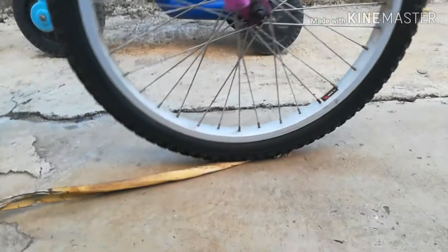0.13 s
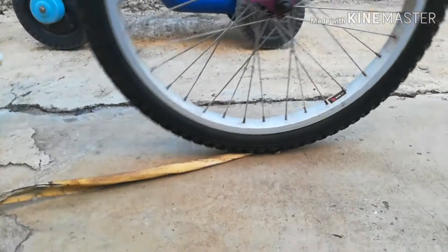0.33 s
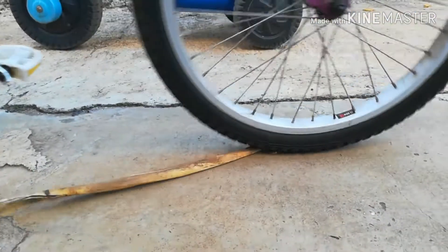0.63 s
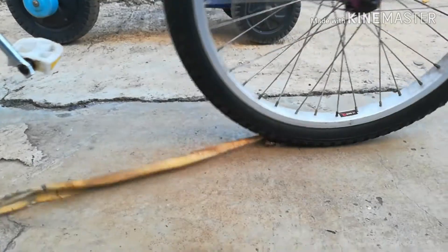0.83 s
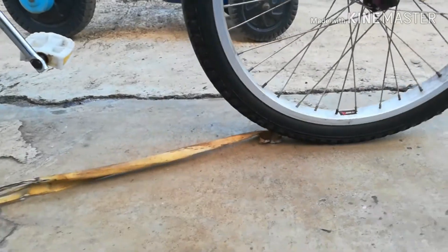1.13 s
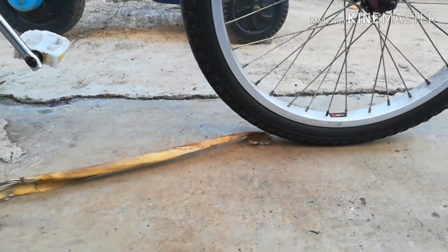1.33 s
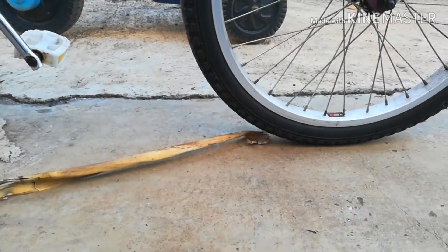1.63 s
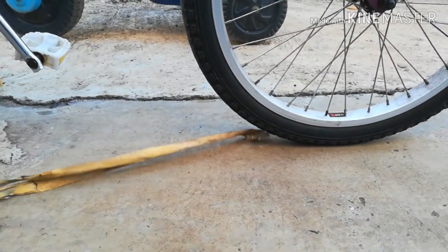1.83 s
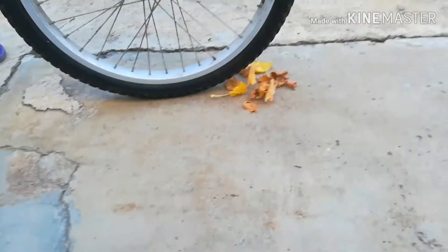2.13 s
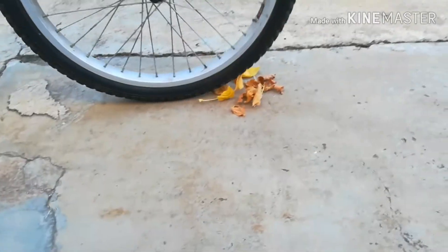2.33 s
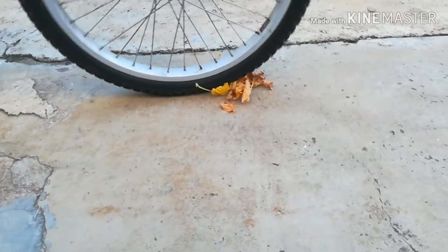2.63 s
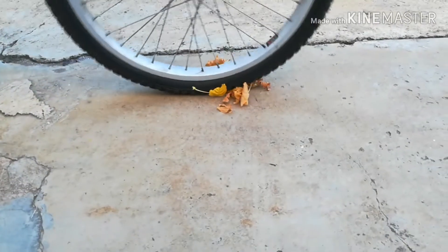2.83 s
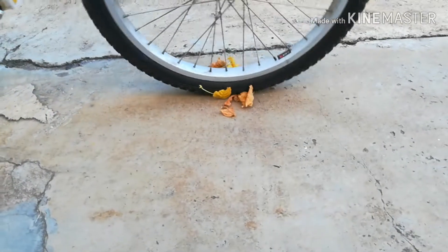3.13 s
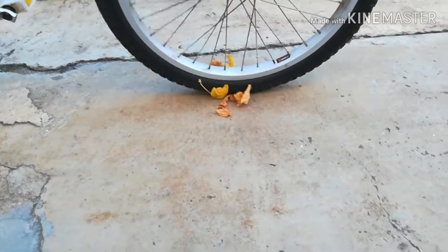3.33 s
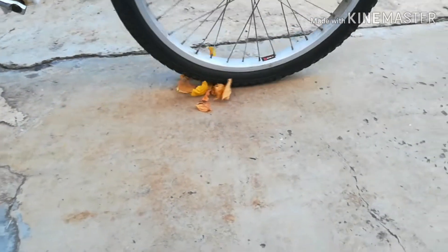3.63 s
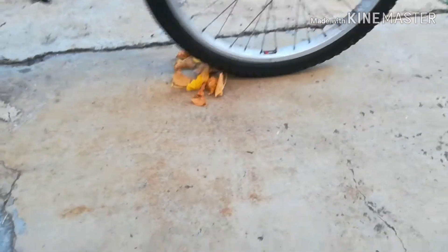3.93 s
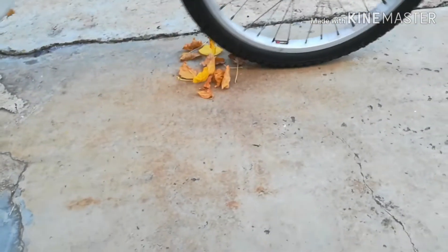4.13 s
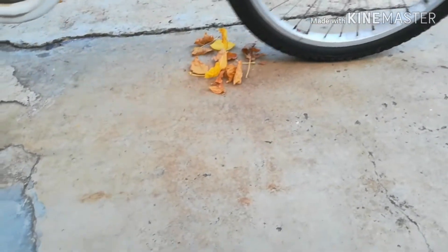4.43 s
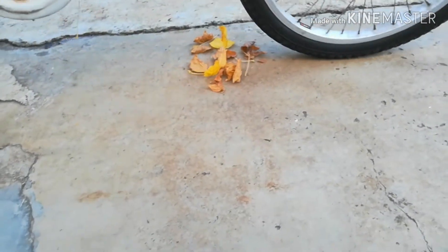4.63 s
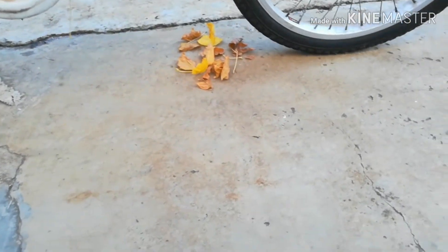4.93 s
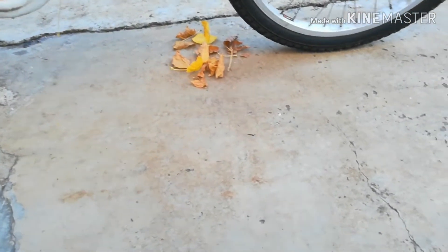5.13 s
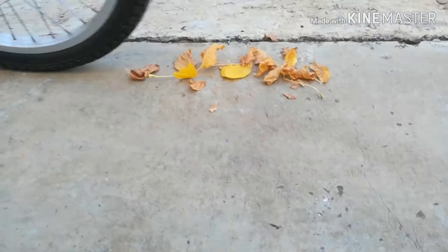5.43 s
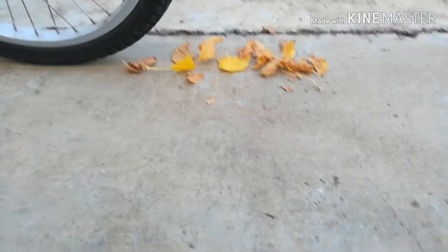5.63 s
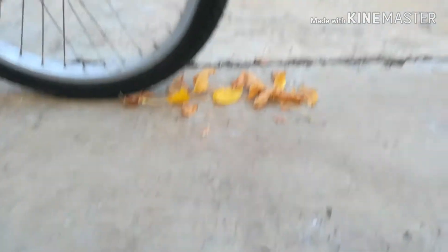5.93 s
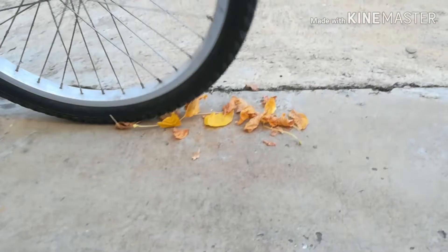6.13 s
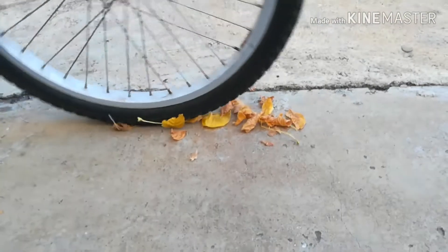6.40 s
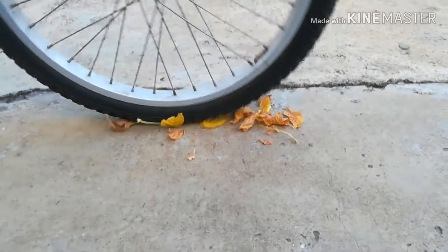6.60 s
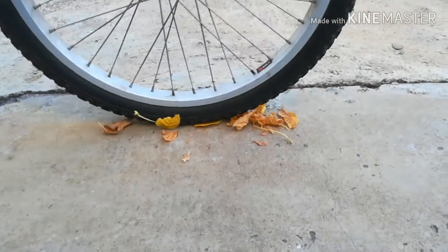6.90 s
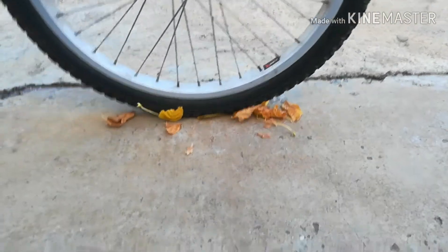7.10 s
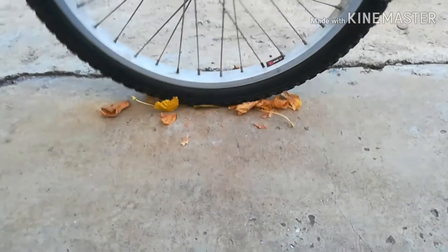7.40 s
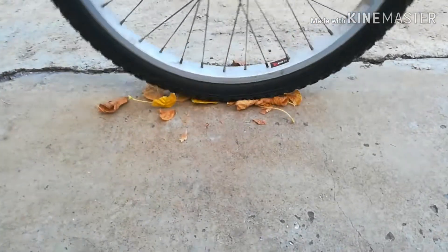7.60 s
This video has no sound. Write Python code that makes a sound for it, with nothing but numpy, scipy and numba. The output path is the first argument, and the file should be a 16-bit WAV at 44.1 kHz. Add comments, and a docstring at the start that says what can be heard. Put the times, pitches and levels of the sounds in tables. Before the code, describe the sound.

A bicycle tyre slowly squeezes a dry husk with faint rasps, then crunches twice through brittle dead leaves with sharp close cracks on concrete.

```python
"""Bicycle tyre over husk and leaves

In a concrete yard, close to a stereo microphone, a tyre rolls over a dry husk, then twice through dead leaves.
Swarms of tiny fractures, made of damped sines, crunch; husk fibres, ribs and stems snap through them as sharp
cracks. Scuffs and three faint breathy squeaks are bands of noise. The tread rumbles and grinds on grit, gusts
buffet the microphone in low noise, and steady partials give a low wavering hum in the quiet outdoor air."""
import sys
import numpy as np
from scipy import signal
from scipy.fft import rfft, irfft
from scipy.io import wavfile
from scipy.ndimage import uniform_filter1d
from numba import njit

SR = 44100
rng = np.random.default_rng(int(sys.argv[2]) if len(sys.argv) > 2 else 0)


def materialize(psi):
    """Save the field psi as 16-bit PCM at rate SR to the path in sys.argv[1].

    A 1-D psi becomes a single channel; in a 2-D psi each row is a channel.
    """
    bounded = np.clip(np.atleast_2d(psi).T, -1, 1)
    quanta = np.round(bounded * 32767).astype(np.int16)
    wavfile.write(sys.argv[1], SR, quanta)


N = 342216
TIME = np.arange(N) / SR


# the tyre's load on the pile of leaves: (time [s], crunch level [dB],
# coarse pieces [dB relative to crunch], fine splinters [dB relative to crunch])
LEAF_PILE = [(2.15, -71, -3, -5), (2.245, -64, -1, 5), (2.3, -49.5, -7.5, 4.5), (2.52, -35.5, -3.5, -5),
             (2.76, -37, -12, -9.5), (3.08, -38, -17, -4), (3.25, -51, -11.5, -3), (3.54, -57, -10.5, -13),
             (3.58, -91, 4, -12)]


def leaf_pile():
    """The first pass through leaves: brittle blades break in coarse grains under the rolling load."""
    return crunch(rolling_over(LEAF_PILE), per_s=2000, spread_db=3.0, cluster_db=4.0, cycles=2.2,
                  steady_s=0.052, hollow_db=-9)


# load on the first curled leaf of the row: columns as for the pile
FIRST_LEAF = [(5.585, -78, -4, -2), (5.605, -55, -1.5, -4), (5.66, -29, -7, -9), (5.75, -28.5, -19, -5.5),
              (5.82, -39, -16, 2.5), (5.89, -47.5, -0.5, 1), (5.98, -50.5, -1.5, -2)]


def first_leaf():
    """The second pass begins on one curled leaf, whose fractures ring a little longer."""
    return crunch(rolling_over(FIRST_LEAF), per_s=2200, spread_db=5.5, cluster_db=2.0, cycles=2.9,
                  steady_s=.019, hollow_db=-9.5)


# load on the rest of the row: columns as for the pile
LEAF_ROW = [(5.98, -51.5, -2, -3.5), (6.25, -50, -0.5, -1), (6.44, -54, 1.5, 1), (6.73, -46.5, -0.5, -3),
            (6.9, -43, -4.5, 0), (7.13, -34.5, -16.5, 0), (7.22, -41, -7, -2), (7.53, -45, -14.5, -4),
            (7.76, -62, -1.5, 2)]


def leaf_row():
    """The rest of the second pass: the pitch of the pieces wanders more widely from leaf to leaf."""
    return crunch(rolling_over(LEAF_ROW), per_s=1800, spread_db=4.0, cluster_db=3.0, cycles=2.2,
                  steady_s=0.07, hollow_db=-6.5, coarse_hz=2430, drift=.24)


# leaves stirred lightly by the passing wheel: (start [s], hold [s], crunch level [dB],
# coarse pieces [dB relative], fine splinters [dB relative], left minus right [dB])
RUSTLES = [(3.6, .22, -70.5, -1, -0.5, 3), (5.15, .005, -71, 6, -7.5, 5), (5.2, 0.0083, -61, 11, -10, 6),
           (5.243, 0.0057, -63, 2, -1, 5), (5.433, 0.006, -59, 8.5, -1, 7), (5.48, 0.0076, -57.5, 5, 0, 5),
           (5.52, 0.0097, -59.5, 7, -13, 1)]


def stirred_leaves():
    """Light touches break only small parts of the leaves."""
    return crunch(touches(RUSTLES), per_s=2000, spread_db=5.5, cluster_db=3.5, cycles=2.3,
                  steady_s=0.011, hollow_db=-7.5)


# ribs and stems that snap, and cracks of the husk while the tyre squeezes it (0.149 to 1.773 s): # (time [s],
# level [dB], middle pitch [Hz], left minus right [dB], splintering [dB relative to the snap])
SNAPS = [(0.149, -26, 7500, 2, -8), (0.1782, -34, 8240, 1, -4), (0.3056, -16, 8800, 1, -23),
         (0.3774, -24, 2780, -7, -7), (0.436, -18.5, 6300, -2, -9), (0.6044, -28.5, 4630, 8, 1),
         (0.9616, -52, 5800, -1, 8.5), (1.532, -49, 1240, -3.5, 5.5), (1.773, -32, 5060, 3, -11),
         (2.3, -8.5, 8050, -8, -22), (2.308, -16, 6750, 5, 1), (2.328, -18, 7900, -12, -3),
         (2.3671, -12.5, 8700, -5, -4.5), (2.386, -16, 7200, -2, 6), (2.505, -10, 5860, -6, -10),
         (2.5418, -4.5, 8900, -7, -9.5), (2.6068, -11.5, 5250, 0, -9), (2.6402, -14, 4900, -1, -3),
         (2.6656, -12.5, 6500, -4, -4), (2.6859, -8.5, 7940, -10, -4), (2.7344, -4.5, 11100, -9, -16),
         (2.7507, -18, 8750, -5, 6), (2.759, -10, 6360, -5, 1.5), (2.7955, -7.5, 8550, -2, 7),
         (2.8529, -8, 6050, -5, 0), (2.8839, -7, 9700, -6, -3), (2.9409, -12.5, 5650, -7, 1),
         (2.9885, -15, 5650, -6, 4), (3.028, -18, 9400, -4, 5.5), (3.053, -17, 6900, 1, -4),
         (3.092, -12, 6100, -3.5, -22), (3.2046, -24, 5700, -8, 5), (3.3404, -25, 5800, -3, 3),
         (3.4016, -24.5, 5300, 0, -10), (3.5288, -30.5, 5340, -7, 0), (3.8746, -37.5, 5980, -3, -13),
         (4.0164, -38.5, 4440, 2, 0), (4.41, -46, 5000, 0, -3), (4.5282, -39.5, 6500, -1, 3),
         (5.1957, -25, 6500, 4.5, 4), (5.4311, -21.5, 6160, 3, -11), (5.617, -12, 6360, 6, -5),
         (5.6592, -2.5, 7100, -10, -12), (5.665, -5.5, 5530, 15, -23), (5.6882, -0.5, 7660, -2, -18),
         (5.7067, -4, 6460, -7, 1.5), (5.7616, -7.5, 5370, -5, -5.5), (5.8289, -9, 6060, 6, -5),
         (5.848, -6.5, 7450, -2, -17), (5.8878, -15.5, 6430, 7, -22), (5.9491, -1.5, 6850, 0, -30),
         (6.123, -26.5, 5170, 11, -18), (6.17, -23.5, 5200, -7, 3.5), (6.2558, -22.5, 7200, -2, 5),
         (6.2824, -17, 6900, 2, -12), (6.3424, -19.5, 5560, 0, 1.5), (6.373, -16.5, 6350, -1, -10),
         (6.632, -23, 6450, 6, 1), (6.7495, -19.5, 6060, 5, 0), (6.8167, -14, 5200, 2, 1),
         (6.952, -12.5, 5660, -2, -2.5), (7.055, -13, 8600, -17, -18), (7.1176, -5.5, 5760, -6.5, -4),
         (7.1442, -8.5, 8500, -7, -17), (7.1971, -9.5, 8000, -5, -5), (7.2687, -7, 6340, -4, -1),
         (7.2877, -4, 9000, -5, -14), (7.3392, -9, 8360, -6, -16), (7.45, -6.5, 5400, -2, -23),
         (7.5204, -20.5, 6760, -6, 0), (7.6105, -26, 8200, -7, -1)]


def snapping():
    """The listed ribs, stems and husk fibres snap, and small veins snap at random among them."""
    return snaps(np.vstack([SNAPS, veins(LEAF_PILE), veins(LEAF_ROW)]))


# spectrum of the leaves: (frequency [Hz], level [dB])
LEAF_COLOUR = [(500, -1), (750, -5), (1050, -5), (1300, -6.5), (1700, -1.5), (2500, -2.5), (3300, -4.5),
               (5000, 0.5), (6500, 0), (9000, 3), (12000, 0.5), (15500, 2.5)]


def leaves():
    """All crunching leaves with the listed snaps, those of the husk included, in the colour of thin dry blades."""
    crunching = stirred_leaves() + leaf_pile() + first_leaf() + leaf_row()
    return colour(undb(-2.0) * crunching + undb(1.5) * snapping(), LEAF_COLOUR)


# the tyre squeezes the husk: columns as for the rustles
SQUEEZES = [(0.01, 0.1, -63.5, 2, 1.5, 0), (.11, 0.1, -67, -20, -4, -2), (.308, 0.018, -55.5, -5, -7, 0),
            (.38, 0.06, -51.5, 2.5, -8, -2), (.43, .03, -44.5, -2.5, -5.5, -1),
            (.48, 0.026, -44.5, -7, -5, 5.5), (.558, .05, -48, -6, -2.5, 3.5),
            (1.597, 0.079, -48.5, -2.5, -9, -2), (1.777, .025, -62, -16, -21, 0)]
# spectrum of the husk: (frequency [Hz], level [dB])
HUSK_COLOUR = [(600, 19), (850, -7), (1050, 3), (1400, -7.5), (1650, -3), (2400, -1.5), (3300, 0.5),
               (4500, -6), (6300, 1), (8500, -1), (15500, -2)]


def husk():
    """The fibrous husk rasps: its fractures come more densely than those of the leaves."""
    rasp = crunch(touches(SQUEEZES), per_s=3800, spread_db=4.5, cluster_db=5.0, cycles=2.7,
                  steady_s=0.02, hollow_db=-6.5)
    return colour(undb(-2.0) * rasp, HUSK_COLOUR)


def crunch(contact, per_s, spread_db, cluster_db, cycles, steady_s, hollow_db, coarse_hz=2100, drift=.18):
    """Fractures come in avalanches; each rings the hollow leaf or husk, a coarse piece, a flake and a splinter."""
    load, coarse_db, fine_db, pan_db = contact
    count = int(per_s * N / SR)
    chance = rng.random((count, 2))
    at = (chance[:, 0] * (N - 1)).astype(int)
    pressed = load[at] > 1e-5
    start = chance[pressed, 0] * (N - 1) / SR
    at = at[pressed]
    # many faint fractures and few strong ones, in clusters
    strength_db = spread_db * np.minimum(-np.log(chance[pressed, 1]), 4)
    size = undb(strength_db + cluster_db * walk(260)[at])
    # (pitch [Hz], band from [Hz], band to [Hz], level [dB])
    pieces = ((1245, 950, 1650, coarse_db + hollow_db),
              (coarse_hz, 1500, 3600, coarse_db),
              (4999, 2697.5, 8039.5, 0),
              (11000, 5760, 17000, fine_db))
    out = 0
    for hz, lo_hz, hi_hz, db in pieces:
        own = rng.standard_normal((count, 3))[pressed].T
        # each fracture has its own pitch, around one that drifts as the wheel passes over
        pitch = hz * np.exp(0.26 * own[0] + drift * walk(25)[at])
        ring = fractures(start, pitch, cycles, size * undb(2.2 * own[1]), pan_db[at] + 5.4 * own[2])
        # the load of the tyre sets how much energy the swarm releases
        out = out + steady(band(ring, lo_hz, hi_hz), steady_s) * load * undb(db)
    return out


def snaps(table, cycles=1.25, rise=0.63, splinter_s=.0025, lead_db=-16, count=12):
    """A rib tears in three brief steps, its onset softened by a faint tick; splinters follow in milliseconds."""
    s, db, hz, pan_db, splinter_db = np.transpose(table)
    lead_s, step_s = .001, .00015
    # the tick comes up to a millisecond ahead
    early = s - lead_s * rng.random(len(s))
    out = fractures(early, hz, cycles, undb(db + lead_db), pan_db, rise=rise)
    # the pitch falls from step to step, and the middle one is the loudest
    for step, (ratio, step_db) in enumerate(((1.51, -8.5), (1, -1.0), (0.56, -12.5))):
        tear = s + (step - 1) * step_s
        out = out + fractures(tear, hz * ratio, cycles, undb(db + step_db), pan_db,
                              scatter_ms=0.032, rise=rise)
    for _ in range(count):
        own = rng.standard_normal((len(s), 3)).T
        late = s + splinter_s * np.abs(own[0])
        size = undb(db + splinter_db + 0.5 * own[2]) / np.sqrt(count)
        out = out + fractures(late, hz * np.exp(0.44 * own[1]), cycles, size, pan_db, rise=0.41)
    return band(out, 1060, 18900)


def veins(table, per_s=22, over_load_db=15, spread_db=3, hz=7000, splinter_db=-3):
    """Small veins give way at random while the tyre presses: rows like those of the snaps."""
    load, _, _, pan_db = rolling_over(table)
    begin, end = table[0][0], table[-1][0]
    own = rng.standard_normal((int(per_s * (end - begin)), 4)).T
    s = rng.uniform(begin, end, own.shape[1])
    at = np.minimum((s * SR).astype(int), N - 1)
    db = 20 * np.log10(load[at] + 1e-9) + over_load_db + spread_db * own[0]
    pitch = hz * np.exp(0.32 * own[1])
    return np.transpose([s, db, pitch, pan_db[at] + 4 * own[2], splinter_db + 4 * own[3]])


def touches(table, attack_s=.008, release_s=0.011):
    """Brief contacts with attack, hold and release; the loudest one sets the colour and the balance."""
    gains = []
    for s, hold_s, db, *_ in table:
        before = np.maximum(s - TIME, 0) / attack_s
        after = np.maximum(TIME - s - hold_s, 0) / release_s
        gains.append(undb(db) * np.exp(-np.minimum(before + after, 20)))
    gains = np.array(gains)
    coarse_db, fine_db, pan_db = np.array(table)[gains.argmax(0), 3:].T
    return gains.max(0), coarse_db, fine_db, pan_db


# where the tyre touches the ground: (time [s], lead of the left port [ms])
BEARING = [(0, 0.1), (3.6, 0.0053), (5.1, 0.38), (6.3, 0.36), (6.8, 0.093), (7.2, -0.0021), (7.76, -0.038)]
# the balance of a long crunch follows the bearing of the wheel
PAN_AHEAD_DB, PAN_DB_PER_MS = -2.5, 11.5


def rolling_over(table):
    """A long contact: the crunch follows the load, and is heard from where the wheel is."""
    level_db, coarse_db, fine_db = curves(table)
    contact = (TIME > table[0][0]) & (TIME < table[-1][0])
    pan_db = PAN_AHEAD_DB + PAN_DB_PER_MS * curves(BEARING)[0]
    return undb(level_db) * contact, coarse_db, fine_db, pan_db


def fractures(start, hz, cycles, size, pan_db, scatter_ms=0.058, rise=.2):
    """Grains at two ports: bearing and scatter set the time lead, pan_db the level difference."""
    lead_ms = np.interp(start, *np.transpose(BEARING)) + scatter_ms * rng.standard_normal(len(start))
    lead = lead_ms / 1000
    hz = np.minimum(hz, SR / 3)
    return np.array([grains(start - side * lead / 2, hz, cycles + 0 * hz,
                            size * undb(side * pan_db / 2), max(rise, .01)) for side in (1, -1)])


@njit
def grains(start, hz, cycles, size, rise):
    """Damped sines that build up over rise cycles and fall by 1 / e in the given number of cycles."""
    out = np.zeros(N)
    for k in range(len(start)):
        first = start[k] * SR
        last = first + 6 * cycles[k] * SR / hz[k]
        for i in range(max(int(first) + 1, 0), min(int(last), N)):
            turn = (i - first) * hz[k] / SR
            envelope = min(turn / rise, 1.) * np.exp(-turn / cycles[k])
            out[i] += size[k] * envelope * np.sin(2 * np.pi * turn)
    return out


# scuffs of dragged pieces, and three faint breathy squeaks of unknown source (at 1.967, 3.722 and 4.423 s):
# (time [s], half length [s], level [dB], middle of the band [Hz], width [Hz])
SCUFFS = [(0.207, 0.079, -66, 7000, 2200), (0.435, 0.036, -57, 1080, 600), (1.687, .008, -58, 3020, 900),
          (1.967, 0.13, -71.5, 2360, 910), (3.722, 0.13, -74, 2570, 600), (4.423, 0.15, -78, 2660, 400),
          (6.542, 0.042, -45, 2640, 1400), (6.53, 0.04, -43.5, 6300, 4500), (7.733, 0.051, -63, 1595, 220)]


def scuffs_and_squeaks(flutter_db=3):
    """Noise that flutters very fast, in one band each: broad ones hiss or scrape, narrow ones squeak."""
    out = 0
    for s, half_s, db, hz, width_hz in SCUFFS:
        rub = rng.standard_normal((2, N)) * undb(flutter_db * walk(500))
        hiss = unit(band(rub, hz - width_hz / 2, hz + width_hz / 2, order=2))
        out = out + hiss * swell(s, half_s, db)
    return out


# how hard the wheel rolls: (time [s], rumble level [dB])
ROLL = [(0, -67), (.38, -84), (.52, -58), (.7, -74.5), (2.8, -68.5), (5.02, -69.5), (5.1, -57), (5.7, -60),
        (6.25, -62), (6.5, -54), (6.94, -59.5), (7.08, -69), (7.39, -62.5), (7.76, -62)]
# grit caught under the tread: (time [s], half length [s], level [dB])
GRINDS = [(.43, .05, -72), (2.56, .05, -72.5), (5.23, .04, -66), (5.52, 0.06, -65.5), (6.02, 0.19, -60.5),
          (6.45, 0.14, -58.5), (6.86, .16, -59), (7.17, 0.083, -68), (7.35, 0.082, -58.5)]
# spectra of rumble and grit: (frequency [Hz], level [dB])
RUMBLE_COLOUR = [(80, -9), (150, 3.5), (220, 4), (330, -4.5), (450, -9.5), (800, -38)]
GRIT_COLOUR = [(250, -28), (450, -1), (650, 3.5), (850, -2), (1200, -3.5), (2500, -14), (6000, -17)]


def tread(grit_db=1.8, grind_share_db=-13):
    """The tyre rumbles while its rubber knobs grind unevenly over the concrete, louder on patches of grit."""
    rumble_db = curves(ROLL)[0]
    rumble = air(RUMBLE_COLOUR, 299) * undb(rumble_db - 1.0)
    grit = steady(air(GRIT_COLOUR, 300) * undb(grit_db * walk(120)), 0.084)
    return rumble + grit * undb(1.0) * swells(GRINDS, rumble_db + grind_share_db)


# gusts on the microphone: (time [s], half length [s], level [dB])
GUSTS = [(.2, .07, -52.5), (.6, 0.17, -54.5), (.85, 0.053, -38.5), (1.27, 0.14, -42), (1.53, 0.089, -30),
         (1.66, 0.036, -32), (3.12, 0.31, -50.5), (5.15, 0.18, -51), (5.52, 0.054, -47.5),
         (6.16, 0.12, -43.5), (6.37, 0.1, -47.5), (6.92, 0.12, -47.5), (7.65, 0.29, -49)]
# spectrum of the wind: (frequency [Hz], level [dB])
WIND_COLOUR = [(14, -30), (25, -5.5), (45, 5), (70, 4), (110, -3.5), (160, -9), (220, -18.5), (300, -35.5),
               (500, -62), (1100, -100)]


def wind(breeze_db=-58.5, breeze_swing_db=1.5, buffet_db=4.0):
    """Eddies push on both ports together: a wavering breeze with bumpy gusts."""
    strength = swells(GUSTS, breeze_db + breeze_swing_db * walk(8.2))
    return steady(air(WIND_COLOUR, 450) * undb(buffet_db * walk(35)), 0.16) * strength


# partials of the low hum: (frequency [Hz], level [dB relative])
HUM = [(86, -3.5), (148.5, 0), (297, -13), (381, -14.5)]
# loudness of the low hum: (time [s], level [dB])
HUM_LEVEL = [(0, -71.5), (1, -67), (2, -67.5), (2.5, -63), (3.3, -63), (4, -66), (4.9, -67), (5.5, -57.5),
             (6.5, -59), (7.76, -63.5)]


def low_hum():
    """A low hum of steady partials that waver a little in pitch and level, equal at both ports."""
    hum = 0
    for hz, db in HUM:
        phase = 2 * np.pi * np.cumsum(hz + 3 * walk(14)) / SR
        hum = hum + undb(db - 0.5 + 2 * walk(4.6)) * np.sqrt(2) * np.sin(phase)
    return hum * undb(curves(HUM_LEVEL)[0])


# spectrum of the open yard: (frequency [Hz], level [dB])
YARD_COLOUR = [(12, -39), (20, 1.5), (44, 8), (120, -24), (150, -2), (172, -25), (234, -9.5), (328, -16.5),
               (377, -16), (660, -28.5), (949, -24), (2670, -29), (2990, -30.5), (6360, -33.5),
               (16000, -40.5)]


def yard_air(level_db=-60.5):
    """Quiet outdoor air: coloured noise that swells a little, very slowly."""
    return air(YARD_COLOUR, 386) * undb(level_db + 0.63 * walk(0.43))


def echoes(x, db, t60, delay, turns_per_s=1.7):
    """Add a diffuse tail, unrelated at the two ports, that cross-fades steadily between two patterns."""
    t = np.arange(int(SR * (t60 + delay))) / SR
    out = x
    angle = 2 * np.pi * turns_per_s * TIME
    for share in (np.cos(angle), np.sin(angle)):
        tail = rng.standard_normal((2, len(t))) * np.exp(-np.log(1000) * t / t60) * (t > delay)
        tail /= np.sqrt(np.sum(tail ** 2, axis=1, keepdims=True))
        out = out + undb(db) * signal.oaconvolve(x * share, tail, axes=1)[:, :N]
    return out


def undb(db):
    """Decibels to gain."""
    return 10 ** (np.asarray(db) / 20)


def curves(table):
    """The columns of a table, joined by straight lines in time."""
    s, *columns = np.transpose(table)
    return [np.interp(TIME, s, c) for c in columns]


def swell(s, half_s, db):
    """A smooth rise and fall around a moment."""
    return undb(db) * np.exp(-((TIME - s) / half_s) ** 2)


def swells(table, base_db):
    """Gain of a base level with swells on top, added as power."""
    return np.sqrt(undb(base_db) ** 2 + sum(swell(*row) ** 2 for row in table))


def walk(rate):
    """Slow chance with a spread near 1, with rate fresh values a second."""
    knots = np.arange(0, N / SR + 1, 1 / rate)
    return np.interp(TIME, knots, rng.standard_normal(len(knots)))


def unit(x):
    """Scale so that the middle of the stereo pair has rms 1."""
    return x / np.sqrt(np.mean(x.mean(0) ** 2))


def steady(x, seconds):
    """Even out the slow level, so that only the quick detail is left."""
    width = int(seconds * SR)
    power = uniform_filter1d(uniform_filter1d(x.mean(0) ** 2, width), width)
    return x / np.sqrt(np.abs(power) + 1e-9)


def band(x, lo_hz, hi_hz, order=3):
    """Causal band-pass."""
    sos = signal.butter(order, [lo_hz, min(hi_hz, SR / 2 - 100)], "band", fs=SR, output="sos")
    return signal.sosfilt(sos, x + 1e-18)


def colour(x, points):
    """Shape a sound by (frequency [Hz], level [dB]) points."""
    hz, db = np.transpose(points)
    freq = np.maximum(np.fft.rfftfreq(N, 1 / SR), 1)
    return irfft(rfft(x) * undb(np.interp(np.log(freq), np.log(hz), db)), N)


def air(points, apart_hz):
    """Stereo noise: alike at both ports in the bass, unrelated above apart_hz."""
    mid, side = rng.standard_normal((2, N))
    side = signal.sosfilt(signal.butter(1, apart_hz, "high", fs=SR, output="sos"), side)
    return unit(colour(np.array([mid + side, mid - side]), points))


def scene():
    """Husk and leaves break close to the microphone, over tread, wind, the quiet yard and a low hum."""
    close = husk() + leaves() + scuffs_and_squeaks()
    # wheel and ground scatter the sound at once, the walls answer faintly
    near = echoes(close, db=-4.0, t60=.04, delay=.0006)
    answered = echoes(near, db=-14.0, t60=0.3, delay=.008)
    return answered + tread() + undb(-1.0) * wind() + yard_air() + low_hum()


# how the two microphone ports differ in colour: (frequency [Hz], left minus right [dB])
PORTS = [(300, 0), (650, 1.5), (1200, 2.5), (2300, -4.5), (4300, 2.5), (8000, 1.5), (15000, -5)]


def record(dry):
    """Each port has its own colour; the tallest peaks are rounded softly, and the recorder cuts the top of the
    treble."""
    ports = np.array([colour(x, [(hz, side * db / 2) for hz, db in PORTS])
                      for x, side in zip(dry, (1, -1))])
    rounded = .75 * np.tanh(ports / .75)
    treble_cut = signal.ellip(10, .2, 80, 15800, fs=SR, output="sos")
    return signal.sosfilt(treble_cut, rounded)


dry = scene()
out = record(dry)
materialize(out)
```